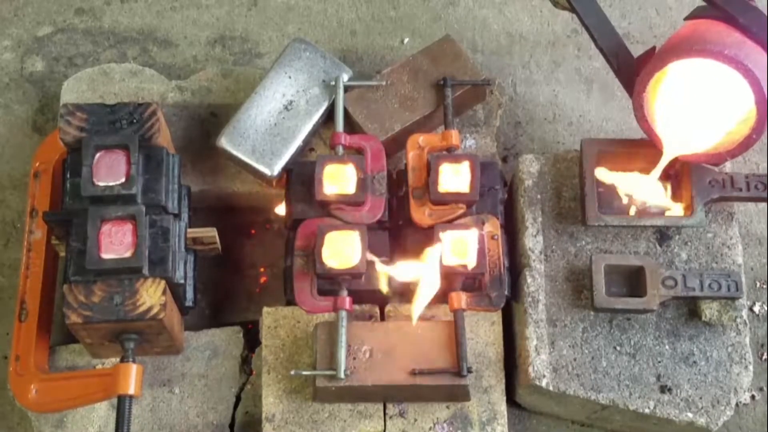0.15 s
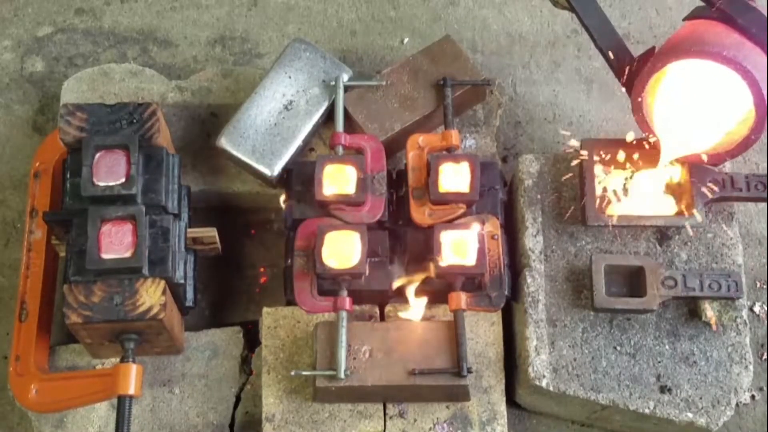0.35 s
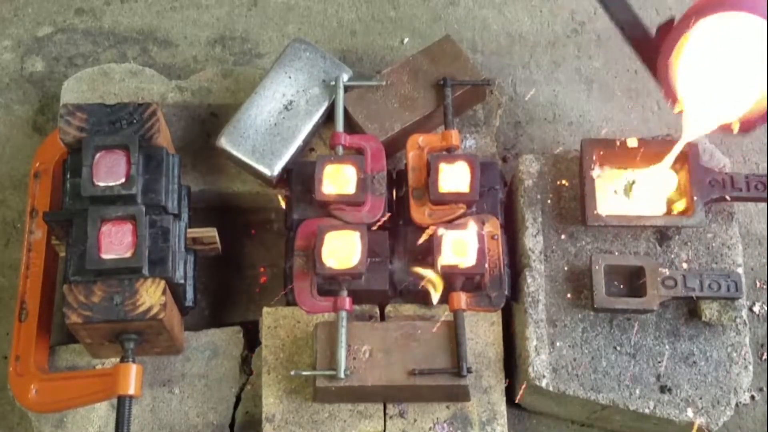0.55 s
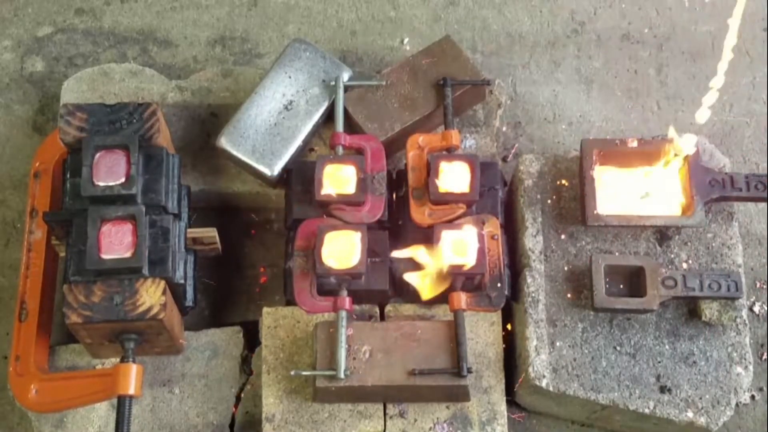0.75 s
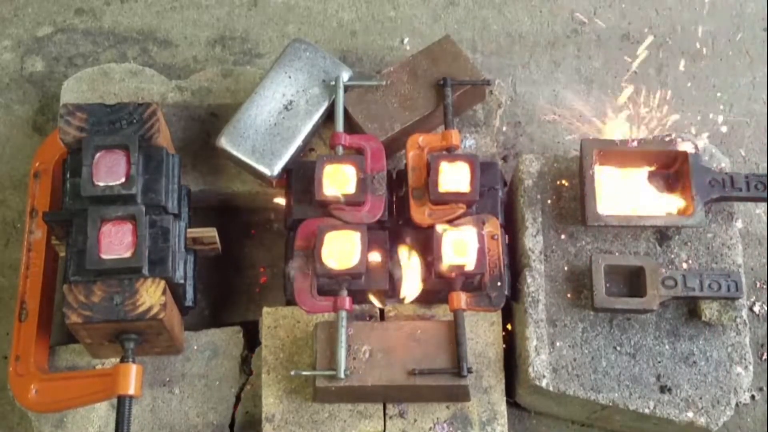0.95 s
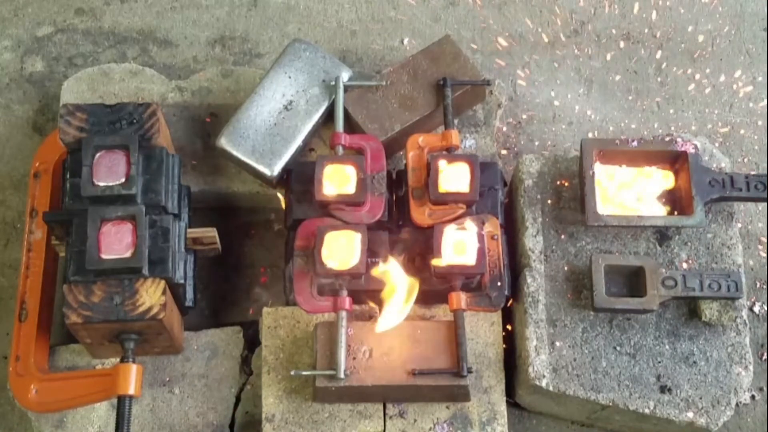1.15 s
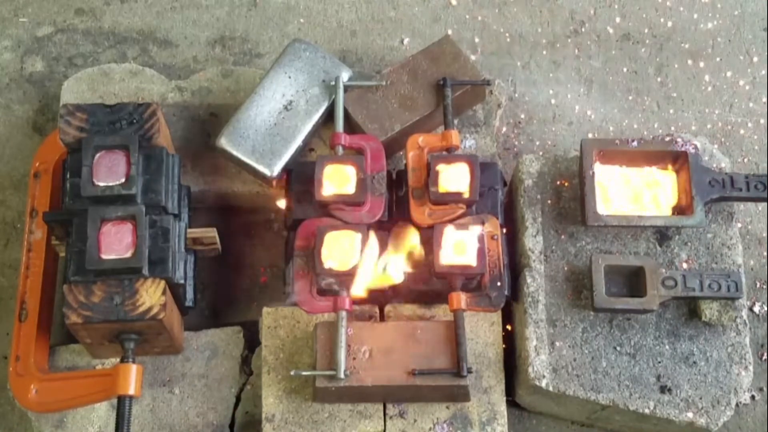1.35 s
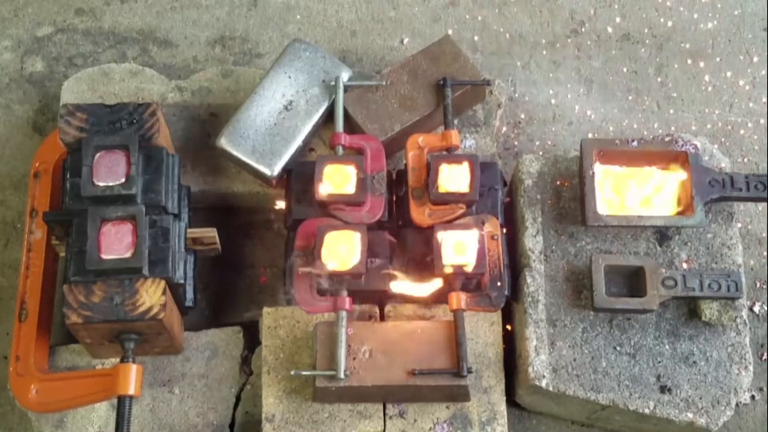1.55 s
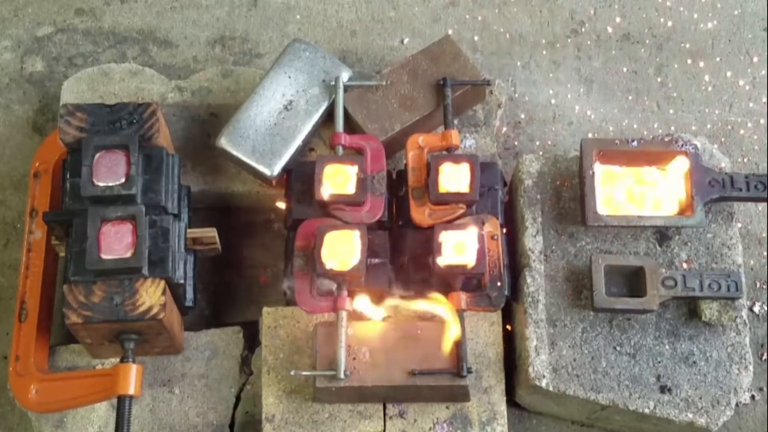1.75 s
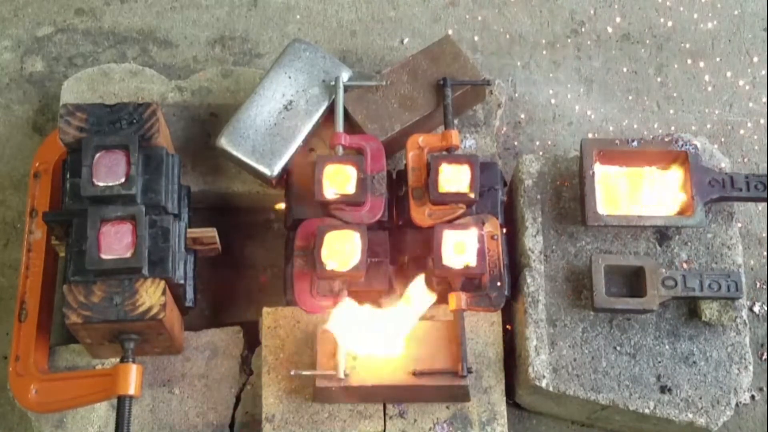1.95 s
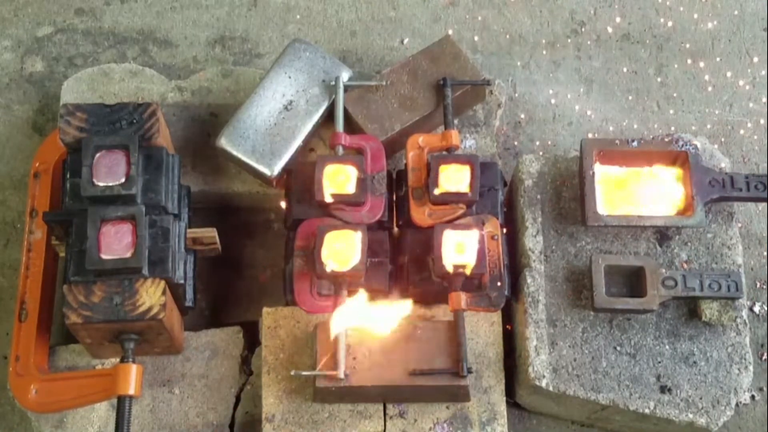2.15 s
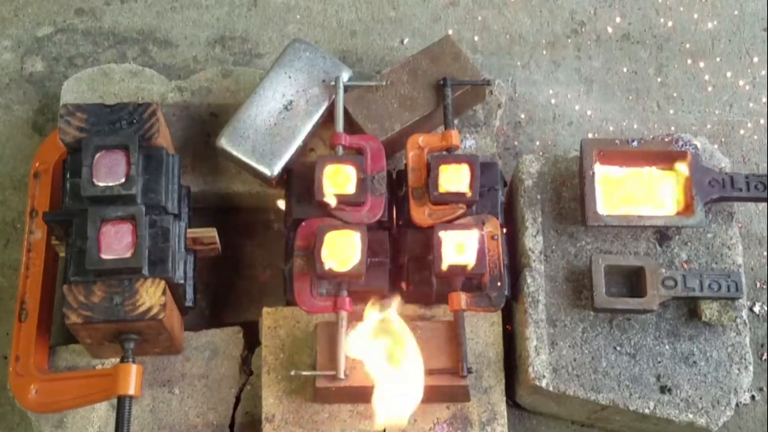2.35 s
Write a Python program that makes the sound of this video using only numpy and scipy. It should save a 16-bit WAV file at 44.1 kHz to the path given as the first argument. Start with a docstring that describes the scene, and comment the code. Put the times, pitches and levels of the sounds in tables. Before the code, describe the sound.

Molten metal hits a damp iron mould with a sharp bang, then sizzles, pops and spits steam and sparks. The hiss dies down, leaving ticking sparks and softly fluttering, puffing flames, heard close in a workshop.

```python
"""Molten metal, poured into an iron mould on a workshop floor, flashes trapped moisture to steam:
a sharp bang and smaller pops, each ringing the damped modes of the mould's hollow. The melt sizzles,
then spits a turbulent jet of steam and sparks, and the sparks tick down all around. Beside it, flames
on scorched wooden moulds flutter and puff. Hard surfaces close by reflect the sudden sounds."""
import sys
import numpy as np
from scipy import signal
from scipy.io import wavfile

SR = 44100
rng = np.random.default_rng(int(sys.argv[2]) if len(sys.argv) > 2 else 0)


def int16_out(signal):
    """Quantize to a 16-bit WAV file."""
    q = np.round(np.clip(np.atleast_2d(signal).T, -1, 1) * 32767)
    wavfile.write(sys.argv[1], SR, q.astype(np.int16))


N = 110250
T = np.arange(N) / SR
CONTACT_S = 0.213  # the melt meets the damp iron
GAS_PAN_DB = -3  # puffs and gurgles, left minus right

# spectrum of the sizzle: f/Hz, relative level/dB
SIZZLE_SPECTRUM = [(700, 10.5), (2000, 8), (4000, 7.5), (6000, -3), (9000, -16.5), (12000, 4), (15000, 7.5)]
# direction of the sizzle: f/Hz, left minus right/dB
SIZZLE_BALANCE = [(1000, 0), (5000, -4.5), (9000, -31.5), (14000, 10)]


def from_db(db):
    """Amplitude ratio of a level in decibels."""
    return 10 ** (np.asarray(db) / 20)


def rms_one(x):
    """Normalisation to unit root-mean-square amplitude."""
    return x / np.sqrt(np.mean(x ** 2) + 1e-20)


def envelope(points):
    """Amplitude envelope through points of t/s, level/dB."""
    return from_db(np.interp(T, *np.transpose(points)))


def at_hz(points, hz):
    """Interpolation on a logarithmic frequency axis."""
    frequencies, values = np.transpose(points)
    return np.interp(np.log(hz), np.log(frequencies), values)


def pan(db):
    """Interaural level difference: two gains, the left db above the right."""
    return from_db([[db / 2], [-db / 2]])


def cut(x, hz, kind, order=2):
    """Butterworth filtering."""
    return signal.sosfilt(signal.butter(order, np.minimum(hz, SR / 2 - 100), kind, fs=SR, output="sos"), x)


def add(out, s, sound, lag_s=0):
    """Superposition of a stereo sound at time s, the left side lag_s later."""
    for side, start in enumerate((s + lag_s, s)):
        i = int(np.clip(round(start * SR), 0, N))
        out[side, i:i + sound.shape[1]] += sound[side, :N - i]


def drift(hz, step=40):
    """Random modulation: noise of unit spread, low-passed at hz."""
    pole = np.exp(-2 * np.pi * hz * step / SR)
    white = rng.standard_normal(N // step + 2002)
    slow = signal.lfilter([1], [1, -2 * pole, pole * pole], white)[2000:]
    return np.interp(np.arange(N) / step, np.arange(len(slow)), rms_one(slow))


def bands(size):
    """Diffuse field: yields (f/Hz, stereo noise), coherent in the bass and independent in the treble."""
    # interaural coherence: f/Hz, correlation
    coherence = [(30, 0), (150, 0.88), (1000, 0.448), (2500, 0.069), (12000, 0)]
    edges = np.geomspace(22, 17500, 27)
    white = rng.standard_normal((2, 2, size))
    for k, (low, high) in enumerate(zip(edges, edges[1:])):
        mid, side = cut(white[k % 2], [low, high], "band")
        hz = np.sqrt(low * high)
        alike = at_hz(coherence, hz)
        yield hz, (np.sqrt(1 + alike) * mid + np.sqrt(1 - alike) * side * [[1], [-1]]) / np.sqrt(2)


def turbulence(spectrum, flutter_db, flutter_hz, patchy_db):
    """Amplitude-modulated noise: all bands flutter together, and each a little by itself."""
    flow = sum(from_db(at_hz(spectrum, hz) + patchy_db * drift(flutter_hz)) * noise
               for hz, noise in bands(N))
    return rms_one(flow * from_db(flutter_db * drift(flutter_hz)))


def ring(modes, pitch=1, size=2048):
    """Impulse response of damped modes given as f/Hz, level/dB, T60/s."""
    t = T[:size]
    return sum(from_db(db - 60 * t / t60) * np.cos(2 * np.pi * hz * pitch * t) for hz, db, t60 in modes)


def air():
    """Ambient noise: the workshop's steady hiss and faint rumble."""
    # noise floor: f/Hz, relative level/dB
    spectrum = [(50, 5), (85, -2.5), (120, 4.5), (350, 0.5), (1600, -7.5), (5000, -14.5), (15000, -13.5)]
    floor = sum(from_db(at_hz(spectrum, hz)) * noise for hz, noise in bands(N))
    return from_db(-63) * pan(-1.3) * rms_one(floor)


def thin_hiss(band_hz=(6900, 7400)):
    """Narrow-band noise, heard as a steady, high hiss."""
    return from_db(-74.5) * rms_one(cut(rng.standard_normal((2, N)), band_hz, "band"))


def workshop(x, scatter_t60=0.12, delay_s=0.0015, size=26000):
    """Reverberation by convolution: early reflections, scatter from the clutter and a short tail."""
    # reflections from hard surfaces: left delay/s, right delay/s, level/dB
    reflections = [(.0009, 0.003, -6), (.0056, .0059, -23.5), (0.0091, 0.016, -14.5)]
    # decay of the tail: f/Hz, T60/s
    decay_times = [(150, 0.6), (1000, 0.36), (4000, 0.3005), (15000, 0.13)]
    # reverberant spectrum: f/Hz, relative level/dB
    spectrum = [(100, -8), (400, -0.5), (1000, -3), (2000, 3.5), (4000, 3), (8000, 7.5), (15000, 4.5)]
    t = T[:size]
    scatter = from_db(-31.5 - 60 * t / scatter_t60)
    diffuse, echoes = np.zeros((2, 2, size))
    for hz, noise in bands(size):
        tail = from_db(-32.5 - 60 * t / at_hz(decay_times, hz))
        diffuse += noise * from_db(at_hz(spectrum, hz)) * np.hypot(scatter, tail)
    for left_s, right_s, db in reflections:
        echoes[[0, 1], [int(left_s * SR), int(right_s * SR)]] += from_db(db)
    response = diffuse * (t > delay_s) + cut(echoes, 3100, "low", order=1)
    narrowed = (x + x.mean(axis=0)) / 2
    return signal.fftconvolve(narrowed, response, axes=1)[:, :N]


def flames():
    """Turbulent combustion noise: a soft, low roar and a brighter rush as the flames flare."""
    # strength of the roar and of the flaring: t/s, level/dB
    roar_levels = [(.2, -71), (.4, -60.5), (.85, -63), (1.1, -54), (1.28, -64), (1.38, -54), (1.46, -56.5),
                   (1.8, -57.5), (2.03, -59.5), (2.19, -52.5), (2.5, -68)]
    flare_levels = [(0, -65.5), (1.2, -60.5), (2.17, -66.5), (2.215, -49), (2.3, -51.5), (2.385, -63),
                    (2.43, -52), (2.5, -52.5)]
    # their spectra: f/Hz, relative level/dB
    roar_spectrum = [(60, -10.5), (280, -5.5), (370, 5), (470, 4), (600, -10), (900, -5.5), (1500, -35),
                     (10000, -30.5)]
    flare_spectrum = [(100, -35), (400, -7), (750, -2.5), (1400, -8.5), (2100, -7.5), (3200, -19),
                      (6000, -25.5), (15000, -35)]
    roar = turbulence(roar_spectrum, flutter_db=3.5, flutter_hz=19, patchy_db=2.5)
    flare = turbulence(flare_spectrum, flutter_db=1.5, flutter_hz=59, patchy_db=3)
    return pan(-1.7) * (envelope(roar_levels) * roar + envelope(flare_levels) * flare)


def flame_puffs(cycles=4.4, attack_s=0.00028, burn_t60=0.11, size=4096):
    """Sudden expansion of igniting gas pockets: a dull snap, a hollow knock and a short rush."""
    # ignitions: t/s, relative level/dB, f/Hz
    ignitions = [(1.2303, -35, 830), (1.3393, -33, 865), (1.3723, -36, 615), (1.526, -29.5, 970),
                 (1.828, -39, 465), (1.9145, -41.5, 740), (2.1912, -40, 538), (2.2162, -29, 1130),
                 (2.2247, -28, 1370), (2.2345, -24, 1100), (2.2828, -24, 1175), (2.3416, -32.5, 1380),
                 (2.4086, -28, 1250), (2.488, -34.5, 1080)]
    knock = (400, -16, 0.013)  # f/Hz, level/dB, T60/s
    t = T[:size]
    out = np.zeros((2, N))
    for s, db, hz in ignitions:
        snap = ring([(hz, 4.5, cycles / hz), knock], size=size) * np.minimum(t / attack_s, 1)
        burn = rms_one(cut(rng.standard_normal(size), [hz / 2, hz * 1.48], "band"))
        burn *= from_db(-19 - 60 * t / burn_t60)
        dull = cut(snap + burn, 2120, "low", order=3)
        add(out, s, from_db(db) * pan(GAS_PAN_DB) * cut(dull, 150, "high", order=1))
    return out


def spark_fizzes(hz=15170, t60=0.15):
    """Exponentially decaying band noise: sparks die with a thin, very high hiss."""
    # dying sparks: t/s, level/dB
    fizzes = [(1.259, -48), (1.776, -46), (2.141, -52)]
    out = np.zeros((2, N))
    for s, db in fizzes:
        hiss = rms_one(cut(rng.standard_normal((2, N)), [hz * 0.9, hz * 1.1], "band"))
        add(out, s, hiss * from_db(db - 60 * T / t60))
    return out


def crack(splinter_t60=0.0045, pitch_spread=0.07, size=2048):
    """Broadband transient: a pressure impulse, a short bright ring and a spray of splinters."""
    # modes of a spark: f/Hz, level/dB, T60/s
    modes = [(3120, -39, 0.00027), (8400, -29.5, 0.00013), (13000, -4, 0.00045)]
    t = T[:size]
    spray = rng.standard_normal((2, size)) * from_db(-14 - 60 * t / splinter_t60)
    splinters = cut(spray, 2500, "high", order=1)
    impulse = from_db(1) * (t == 0)
    pitch = np.exp(pitch_spread * rng.uniform(-1, 1))
    return cut(impulse + ring(modes, pitch, size) + splinters, 1730, "high")


def spark_ticks():
    """Impulsive point sources: single sparks crack and land close to the ear."""
    # sparks: t/s, relative level/dB, left minus right/dB
    landings = [(.3461, -22, -3), (0.5299, -24.5, -7), (0.552, -27.5, -6), (0.764, -24.5, -12.5),
                (1.1313, -34, 2), (1.2656, -38.5, -1), (1.3489, -38, -6), (1.691, -39.5, 0),
                (1.7742, -25.5, -1), (1.8516, -36, 6), (2.191, -42.5, 8), (2.2943, -39, 0)]
    out = np.zeros((2, N))
    for s, db, pan_db in landings:
        add(out, s, from_db(db) * pan(pan_db) * crack())
    return out


def jet():
    """Turbulent jet noise of steam and sparks blown out of the melt."""
    # strength of the jet: t/s, level/dB
    levels = [(.3, -50), (.47, -53.5), (.72, -46), (.8, -51.5), (.915, -51.5), (.945, -41.5), (1.015, -48),
              (1.055, -49.5), (1.061, -37.5), (1.14, -44), (1.2, -67), (1.5, -75)]
    # its spectrum: f/Hz, relative level/dB
    spectrum = [(60, -18.5), (200, -8.5), (700, -6), (1800, -10), (2600, -8.5), (4000, -11.5),
                (6000, -16.5), (15000, -27.5)]
    flow = turbulence(spectrum, flutter_db=3.5, flutter_hz=68, patchy_db=2)
    return envelope(levels) * (T > CONTACT_S) * pan(-1.54) * flow


def gurgles():
    """Band-limited noise under Gaussian envelopes: gas sputters out in short, hollow rushes."""
    # escaping gas: centre t/s, relative level/dB, f/Hz, 1/e half-duration/s, relative bandwidth
    escapes = [(0.917, -45, 820, 0.035, 0.28), (0.989, -42, 988, 0.013, 0.24),
               (1.083, -38, 1710, 0.0057, 0.17), (1.139, -47, 656, 0.0213, 0.51),
               (1.821, -50, 742, 0.0051, .12), (1.938, -46.5, 738, 0.0141, 0.87),
               (2.124, -52.5, 825, 0.012, 0.88)]
    out = 0
    for s, db, hz, half_s, width in escapes:
        band = [hz * np.exp(-width / 2), hz * np.exp(width / 2)]
        noise = rms_one(cut(rng.standard_normal(N), band, "band"))
        hollow = cut(np.tanh(noise), band, "band", order=1)  # saturation evens the amplitude
        swell = np.exp(-np.minimum(((T - s) / half_s) ** 2, 50))
        amplitude = np.sqrt(2 * np.average(hollow ** 2, weights=swell ** 2))
        out += from_db(db) * swell * hollow / amplitude
    return pan(GAS_PAN_DB) * out


def crackle(bursts_per_s=600, cycles=5, pitches=12):
    """Shot noise: tiny bursts at random times, each ringing one resonator for a few cycles."""
    size_db = 6 * np.minimum(rng.exponential(1, N), 3) + 4 * rng.uniform(-1, 1, (2, N))
    polarity = rng.choice([-1, 1], N)
    clicks = from_db(size_db) * polarity * (rng.random(N) < bursts_per_s / SR)
    resonator = rng.integers(0, pitches, N)
    out = 0
    for k, hz in enumerate(np.linspace(2500, 15500, pitches)):
        pole = from_db(-60 * hz / cycles / SR)
        feedback = [1, -2 * pole * np.cos(2 * np.pi * hz / SR), pole ** 2]
        grains = (1 - pole ** 2) * signal.lfilter([1, 0, -1], feedback, clicks * (resonator == k) + 1e-18)
        grains[0] = np.roll(grains[0], rng.integers(-4, 9))  # interaural time difference
        out += grains / np.sqrt(hz) * from_db(at_hz(SIZZLE_SPECTRUM, hz)) * pan(at_hz(SIZZLE_BALANCE, hz))
    return rms_one(out)


def sizzle():
    """Boiling noise of the melt on damp iron; the crackle dies away sooner than the hiss."""
    # vigour of the boiling: t/s, relative level/dB
    levels = [(.2, -42.5), (.4, -48.5), (.48, -54), (.68, -47), (.85, -51), (1.1, -48), (1.25, -57),
              (1.9, -66), (2.5, -58)]
    vigour = envelope(levels)
    steam = sum(from_db(at_hz(SIZZLE_SPECTRUM, hz)) * pan(at_hz(SIZZLE_BALANCE, hz)) * noise
                for hz, noise in bands(N))
    hiss = from_db(-2) * rms_one(cut(steam, 440, "high"))
    bursts = from_db(1) * np.sqrt(vigour / vigour.max()) * crackle()
    return vigour * (T > CONTACT_S) * (hiss + bursts)


def steam_pops(pitch_spread=0.08):
    """Cavity resonance: each steam burst rings the mould's hollow, with a crack above and a thud below."""
    # steam bursts: t/s, relative level/dB, low-pass f/Hz, crack gain/dB, left minus right/dB
    bursts = [(0.214, 1, 6700, -4, -2.5), (0.2258, -10, 3000, -9, 3), (0.271, -5, 3170, -2, -0.5),
              (0.3823, -21, 5950, 10.5, -5), (0.5888, -33.5, 4880, 12, -8), (0.6167, -31.5, 6700, 4, -14),
              (0.6497, -29, 6800, 13, 1), (0.6769, -21.5, 7900, 3.5, -14), (0.7733, -20.5, 3520, 4.5, -10),
              (0.7794, -26, 1800, 3, 8), (0.9301, -17, 4660, -6, -7), (0.981, -18, 2328, -9, -8),
              (0.9915, -28.5, 3000, 5, 0), (1.0607, -26.5, 6100, -14, -8), (1.3986, -35.5, 6000, 1, -12.5)]
    # modes of the hollow: f/Hz, level/dB, T60/s
    modes = [(1128, -8.5, 0.0049), (1720, -27.5, 0.00494), (1910, -13.5, 0.0069), (3000, -10.5, 0.0015),
             (4080, -13, 0.0023)]
    thud = (390, -35, 0.0074)  # one more mode
    out = np.zeros((2, N))
    for s, db, bright_hz, crack_db, pan_db in bursts:
        stray = pitch_spread * (1 - from_db(db))  # small bursts stray further in pitch
        pitch = np.exp(stray * rng.uniform(-2.05, 1))
        hollow = cut(ring(modes + [thud], pitch), bright_hz, "low")
        body = pan(pan_db) * cut(hollow, 295, "high")
        snap = from_db(crack_db - 3.5) * pan(1.5) * crack()
        add(out, s, from_db(db) * (body + snap), lag_s=0.00006)
    return out


def scene():
    """Superposition of the direct sounds and the reverberation of pops, gurgles, puffs and ticks."""
    mould = steam_pops() + gurgles()
    puffs, ticks = flame_puffs(), spark_ticks()
    room = workshop(mould + from_db(-2.5) * puffs + from_db(-5.5) * ticks)
    noises = jet() + flames() + spark_fizzes() + sizzle() + air() + thin_hiss()
    return mould + puffs + ticks + room + noises


def record(dry, cutoff_hz=16000):
    """Soft saturation rounds the loudest peak, and a steep low-pass limits the bandwidth."""
    return signal.sosfilt(signal.ellip(12, 0.1, 80, cutoff_hz, fs=SR, output="sos"), np.tanh(dry))


dry = scene()
out = record(dry)
int16_out(out)
```